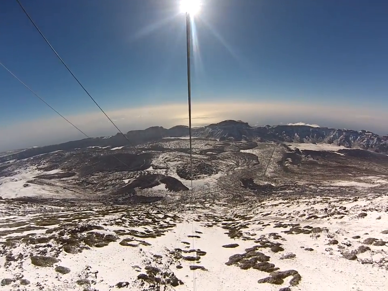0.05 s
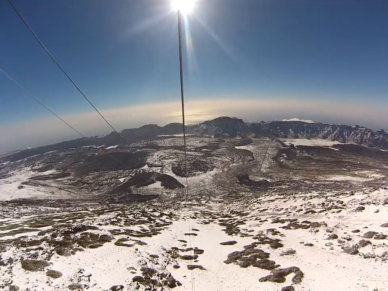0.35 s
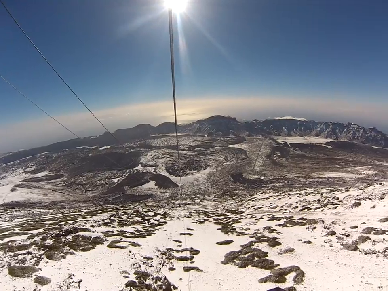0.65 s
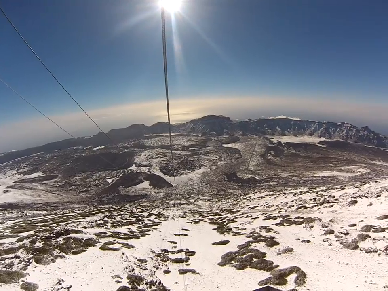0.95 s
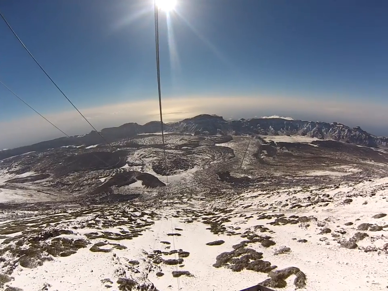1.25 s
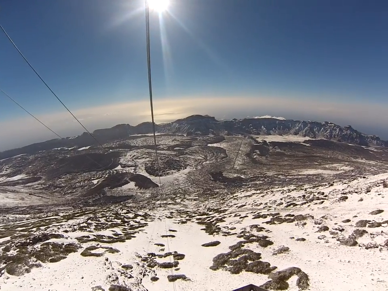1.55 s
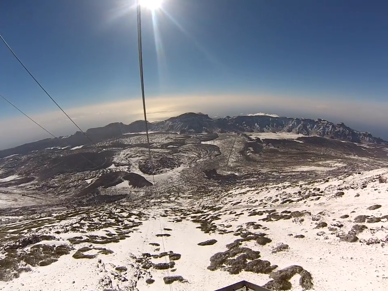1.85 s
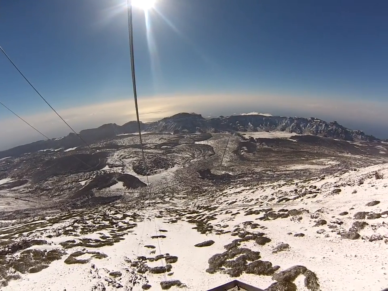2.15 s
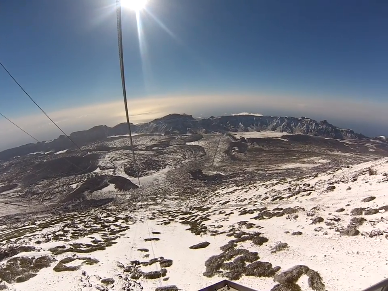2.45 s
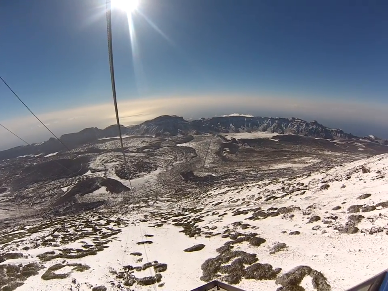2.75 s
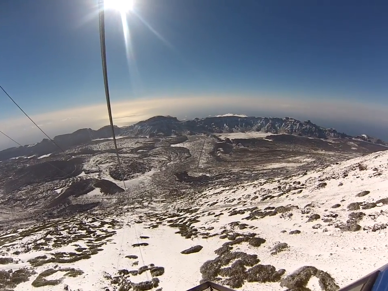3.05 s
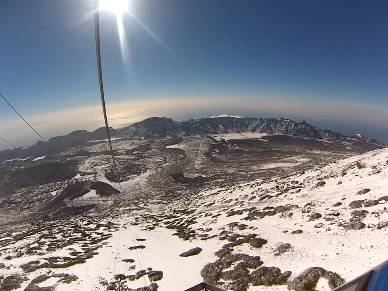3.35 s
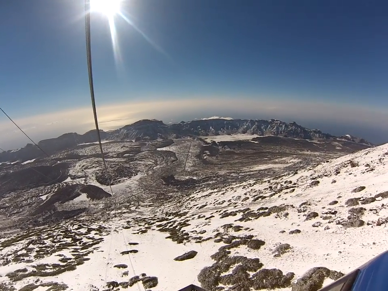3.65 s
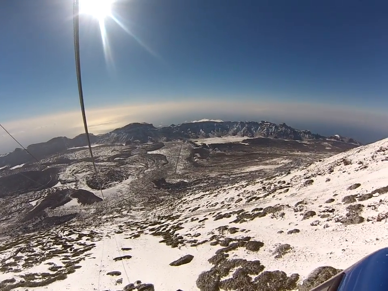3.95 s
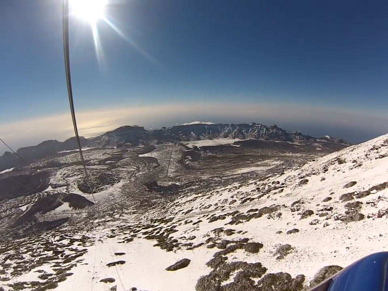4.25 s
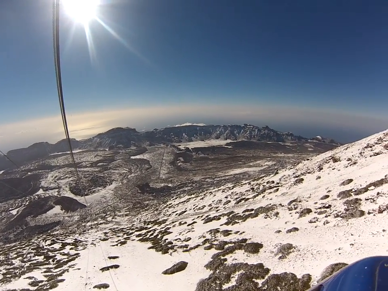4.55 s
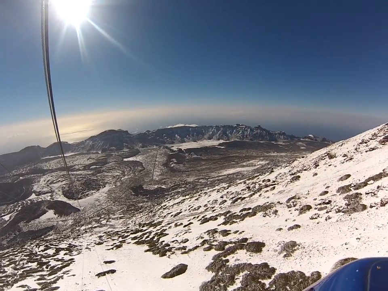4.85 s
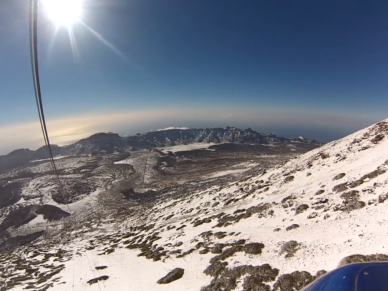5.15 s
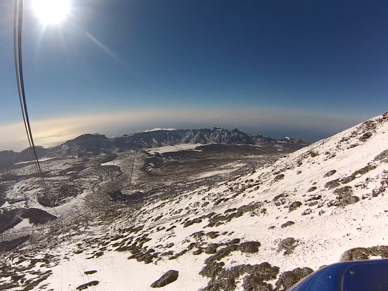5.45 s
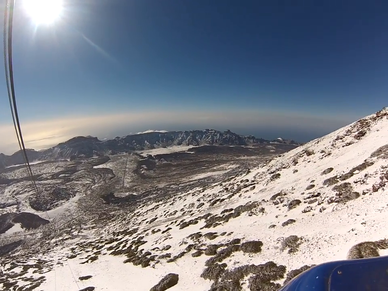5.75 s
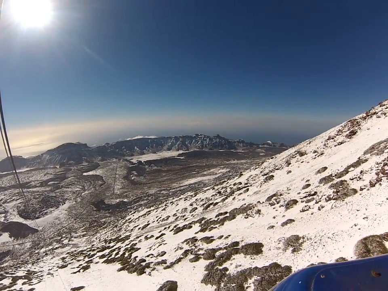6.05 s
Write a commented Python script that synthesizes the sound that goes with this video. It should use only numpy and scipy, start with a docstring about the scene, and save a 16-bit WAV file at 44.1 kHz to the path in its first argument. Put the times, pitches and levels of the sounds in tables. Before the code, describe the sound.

Gusty wind rumbles and thumps on the microphone in a moving cable car, over a faint throbbing hum, thin whine and hiss.

```python
"""Inside a moving cable car cabin, with wind gusting in at a small microphone.
From the start, gusts rumble over a thin whine and a slowly throbbing hum from the running gear, and a
hiss of air. Eddies (small swirls of wind) thump the microphone; a limiter turns the sound down briefly
after the hardest thumps. The wind eases after 1.5 s, then returns near 3 s and again near 5 s.
In that last spell the cabin slows: the hum sinks in pitch, the whine fades and the hiss softens."""
import sys
import numpy as np
from scipy import signal
from scipy.fft import rfft, irfft
from scipy.io import wavfile
from scipy.ndimage import uniform_filter1d

SR = 44100
rng = np.random.default_rng(int(sys.argv[2]) if len(sys.argv) > 2 else 0)


def transcribe(u):
    """Save the signal u as a 16-bit wav file named by the first command-line argument.

    u: samples, shape (n,) or (channels, n), limited to [-1, 1]; the rate is SR.
    q: integer samples, one column per channel.
    """
    v = np.clip(np.atleast_2d(u).T, -1, 1)
    q = np.round(v * 32767).astype(np.int16)
    wavfile.write(sys.argv[1], SR, q)


N = 277830
TIME = np.arange(N) / SR
FREQUENCIES = np.fft.rfftfreq(N, 1 / SR)

# Tone colour of the finest whirls of wind: (frequency [Hz], relative level [dB])
WHIRL_SPECTRUM = [(150, 2), (290, 10), (500, 0.5), (700, -12.5), (1100, -24), (2000, -48), (4000, -74)]


def amp(db):
    """Turns decibels into a number to multiply a sound by."""
    return 10 ** (np.asarray(db) / 20)


def unit(x):
    """Scales a signal so that its average size (rms) is 1."""
    return x / np.sqrt(np.mean(x ** 2) + 1e-20)


def curves(rows):
    """Joins a table's points with straight lines: one curve for each column after the time."""
    times, *columns = np.transpose(rows)
    return [np.interp(TIME, times, column) for column in columns]


def noise(gain):
    """Noise of average size 1, shaped by a gain for each frequency."""
    return unit(irfft(rfft(rng.standard_normal(N)) * gain, N))


def coloured(spectrum):
    """Noise whose tone colour follows a table of frequencies and levels."""
    hz, db = np.transpose(spectrum)
    return noise(amp(np.interp(np.log(FREQUENCIES + 1), np.log(hz + 1), db)))


def wander(hz):
    """A random wobble, mostly slower than the given rate."""
    return noise(1 / (1 + (FREQUENCIES / hz) ** 4))


def ringing(hz, width_hz):
    """Noise gathered around one pitch, like something that rings."""
    return noise(1 / (1 + ((FREQUENCIES - hz) / (0.6 * width_hz)) ** 2))


def steadied(x, span_s):
    """Evens out a noise's own slow swings in loudness."""
    return x / np.sqrt(uniform_filter1d(x ** 2, max(int(span_s * SR), 8)) + 0.051)


def wind(rumble_db=-23, buffet_db=-32.5, flutter_db=-50, lumpy_db=3.5, ragged_db=7.5):
    """Rough air hits the microphone: big swells rumble, smaller ones buffet, fine whirls flutter."""
    # Three gusty spells with lulls between: (time [s], wind strength [dB])
    gusty_spells = [(0, 4.5), (.08, -2.5), (.47, 5.5), (.61, -7), (.88, 2.5), (.97, 8), (1.06, -6),
                    (1.28, -2.5), (1.38, 5), (1.5, -1.5), (2.88, -4), (2.96, 5), (3.11, 6.5), (3.2, 3),
                    (3.55, -1), (3.78, -0.5), (3.97, -5), (4.74, 0.5), (4.85, 3), (5.07, 6.5), (5.34, 1),
                    (5.66, 7), (5.97, -0.5), (6.3, 1.5)]
    # Rise and fall of the rumble, on top of what the wind gives it: (time [s], extra level [dB])
    rumble_extra = [(0, 1), (1.0, 0.5), (1.4, 0), (2.25, -4), (2.7, 2.5), (3.15, -1.5), (3.7, 1.5),
                    (4.95, 1), (5.6, -2), (6.2, -1.5)]
    # Tone colour of the big swells: (frequency [Hz], relative level [dB])
    rumble_spectrum = [(8, -48), (20, 3.5), (42, 0), (65, -2.5), (95, -7.5), (140, -32.5), (220, -23),
                       (500, -84.5)]
    # Tone colour of the buffets: (frequency [Hz], relative level [dB])
    buffet_spectrum = [(40, 4), (85, 3.5), (125, 7), (190, -1), (270, -12.5), (400, -22), (700, -59),
                       (1500, -86)]
    strength_db, = curves(gusty_spells)
    extra_db, = curves(rumble_extra)
    lumps, gusts = wander(hz=22), wander(hz=6)
    # The finer the swirl, the more it needs a strong wind.
    rumble_gain = amp(rumble_db + 0.71 * strength_db + 1.7 * gusts + extra_db)
    buffet_gain = amp(buffet_db + 1.45 * strength_db + 3.03 * gusts)
    flutter_gain = amp(flutter_db + 1.48 * strength_db + 2.5 * gusts)
    rumble = steadied(coloured(rumble_spectrum), span_s=0.0926)
    # Sharing the same quick lumps makes the whirls ride on the buffets.
    buffet = steadied(coloured(buffet_spectrum) * amp(lumpy_db * lumps), span_s=0.08)
    flutter = steadied(coloured(WHIRL_SPECTRUM) * amp(ragged_db * lumps), span_s=0.056)
    return rumble_gain * rumble + buffet_gain * buffet + flutter_gain * flutter


def tone(hz):
    """A pure tone of average size 1 that follows a pitch curve."""
    return np.sqrt(2) * np.sin(2 * np.pi * (np.cumsum(hz) / SR + rng.random()))


def running_gear(twin_db=-6, beat_hz=2, beat_peak_s=2.2, flicker_db=3.5, rasp_db=-7):
    """The machinery that carries the cabin makes a low, throbbing hum and a thin, raspy whine."""
    # The gear's hum, sinking as the cabin slows: (time [s], pitch [Hz], relative level [dB])
    hum_path = [(0, 225, -45.5), (.7, 222.3, -44), (1.6, 225.3, -48), (2.2, 228.3, -37.5),
                (2.6, 229.4, -54.5), (3.2, 226.6, -36.5), (4.7, 227.7, -43), (5.2, 221, -37),
                (5.7, 218.4, -34.5), (6.3, 212, -38.5)]
    # The gear's whine: (time [s], pitch [Hz], relative level [dB])
    whine_path = [(0, 899, -58), (.7, 900, -55), (1.5, 894, -59), (2.5, 889, -53), (2.95, 896, -59.5),
                  (3.75, 889, -52.5), (4.0, 892.7, -58), (5.2, 893, -58), (6.3, 896, -71)]
    hum_hz, hum_db = curves(hum_path)
    whine_hz, whine_db = curves(whine_path)
    # A weaker twin just above the hum drifts in and out of step with it, so the loudness throbs.
    throb = abs(1 + amp(twin_db) * np.exp(2j * np.pi * beat_hz * (TIME - beat_peak_s)))
    hum = amp(hum_db - 1) * throb * tone(hum_hz + wander(hz=9))
    whine = amp(flicker_db * wander(hz=29)) * tone(whine_hz + 3 * wander(hz=33))
    rasp = amp(rasp_db) * ringing(937, width_hz=67)
    return hum + amp(whine_db - 2) * (whine + rasp)


def air(hiss_db=-49, treble_hz=4000, waver_db=0.4):
    """Air streams past and makes the cabin ring; the high hiss wavers and softens as the cabin slows."""
    # Tone colour of the passing air: (frequency [Hz], relative level [dB])
    hiss_spectrum = [(180, -42), (300, -27), (410, -13), (438, -3), (639, -0.5), (792, -10), (832, -13),
                     (903, -5), (1050, -8.5), (1320, -16), (1610, -14), (2310, -9.5), (4100, -16),
                     (12800, -19), (15300, -23)]
    # How the high hiss drops with the cabin's speed: (time [s], level change [dB])
    slowing = [(0, -0.3), (2, 0), (4.4, -1.06), (6.3, -3.5)]
    # Pitches at which the cabin rings: (pitch [Hz], width [Hz], relative level [dB])
    cabin_rings = [(175.5, 33, -61), (555, 8, -63), (783.6, 17, -66.5), (894, 81, -61), (1235, 140, -63.5),
                   (1329, 9.3, -69), (1453, 8.6, -72.5), (1719, 17, -72), (2244, 57, -64.5),
                   (2645, 140, -68.5), (2630, 130, -80), (3404, 66, -69), (3710, 140, -65), (4870, 70, -84),
                   (5610, 910, -65.5)]
    hiss = amp(hiss_db) * coloured(hiss_spectrum)
    dull = signal.lfilter(*signal.butter(1, treble_hz, fs=SR), hiss)
    speed_db, = curves(slowing)
    treble = (hiss - dull) * amp(speed_db + waver_db * wander(hz=25))
    ring = sum(amp(db - 1) * ringing(hz, width_hz) for hz, width_hz, db in cabin_rings)
    return dull + treble + ring


def eddies(wake_rise_s=0.0048, wake_fade_s=0.013, leak_hz=38, smooth_hz=1700, crackle_db=-31):
    """Each eddy thumps the microphone with a rounded spike of pressure and trails a wake of whirls."""
    # Eddies that hit the microphone: (time [s], strength [dB], half width before filtering [ms],
    # push or pull [+1 or -1], relative wake level [dB])
    hits = [(0.153, -17, 1.4, -1, -9), (0.2602, -13, 0.55, -1, -14), (0.3058, -6, 0.51, -1, -24.5),
            (0.32, -1.5, 4, -1, -54), (0.423, 1, 4.3, 1, -31), (0.501, -5, 2, -1, -39),
            (0.5555, -2.5, 1.15, -1, -27), (0.664, -7, 0.95, 1, -18), (0.7437, -2.5, 1.06, -1, -26.5),
            (0.861, -8, 1.8, 1, -26), (1.0092, 4.5, 2.0, 1, -33), (1.14, -16, 1.2, -1, -18),
            (1.324, -13, 1.9, -1, -15.5), (1.816, -17.5, 1.3, 1, -21), (2.981, -10.5, 0.78, 1, -14.5),
            (3.052, -6, 6.1, 1, -22), (3.1059, -16, 1.1, -1, -4.5), (3.312, -15.5, 0.74, 1, -19),
            (3.8095, 1.5, 2.6, 1, -29), (4.8486, -3, 1.6, -1, -21), (4.865, -3.5, 2.5, -1, -43),
            (5.0706, -1.5, 2.1, 1, -17.5), (5.2016, -2, 2.4, 1, -21), (5.2144, -3.5, 0.56, -1, -16.5),
            (5.4252, -6.5, 0.29, 1, -8), (5.652, -14.5, 0.72, 1, -24), (5.6744, -5.5, 0.6, 1, -12.5),
            (6.1745, -11, 2.09, -1, -11.5), (6.1855, -0.5, 1.17, -1, -20)]
    # Tone colour of the crackle before it is dulled: (frequency [Hz], relative level [dB])
    crackle_spectrum = [(800, 26.5), (1700, 15.5), (3500, 10.5), (5500, 13.5)]
    spikes, wake_shape = np.zeros(N), np.zeros(N)
    for hit_s, db, width_ms, direction, wake_db in hits:
        age_s = TIME - hit_s
        widths_from_peak = age_s * 1000 / width_ms
        spikes += np.sign(direction) * amp(db) / (1 + widths_from_peak ** 2)
        rise_and_fade = np.exp(-np.maximum(age_s / wake_fade_s, -age_s / wake_rise_s))
        wake_shape += amp(db + wake_db - 3) * rise_and_fade
    # The microphone's vent lets pressure leak, so every spike swings back.
    spikes = signal.lfilter(*signal.butter(1, leak_hz, "high", fs=SR), spikes)
    spikes = signal.lfilter(*signal.butter(3, smooth_hz, fs=SR), spikes)
    # The tip of each hard spike carries a faint crackle.
    fizz = signal.lfilter(*signal.butter(2, 5500, fs=SR), coloured(crackle_spectrum))
    crackle = amp(crackle_db) * np.tanh(2 * spikes ** 2) * unit(fizz)
    wakes = wake_shape * steadied(coloured(WHIRL_SPECTRUM), span_s=0.0133)
    return spikes + crackle + wakes


def scene():
    """All the sounds add up at one microphone."""
    return (wind() + running_gear() + air() + eddies())[None]


def record(dry, threshold_db=-11, recovery_db_per_s=90, lag_s=0.005, top_hz=15350):
    """A limiter lets each spike through, dips the level and recovers; the highest treble is cut off."""
    span = round(lag_s * SR)
    average = np.ones(span) / span  # averaging makes the limiter react a little late
    level_db = 20 * np.log10(signal.lfilter(average, [1], abs(dry[0])) + 1e-9)
    excess_db = np.maximum(level_db - threshold_db, 0)
    # Hold on to each peak, then let go at a steady rate.
    recovery_db = TIME * recovery_db_per_s
    dip_db = np.maximum.accumulate(excess_db + recovery_db) - recovery_db
    limited = dry * amp(-signal.lfilter(average, [1], dip_db))
    treble_cut = signal.firwin(1023, top_hz, window=("kaiser", 9), fs=SR)
    return signal.oaconvolve(limited, treble_cut[None], "same")


dry = scene()
out = record(dry)
transcribe(out)
```